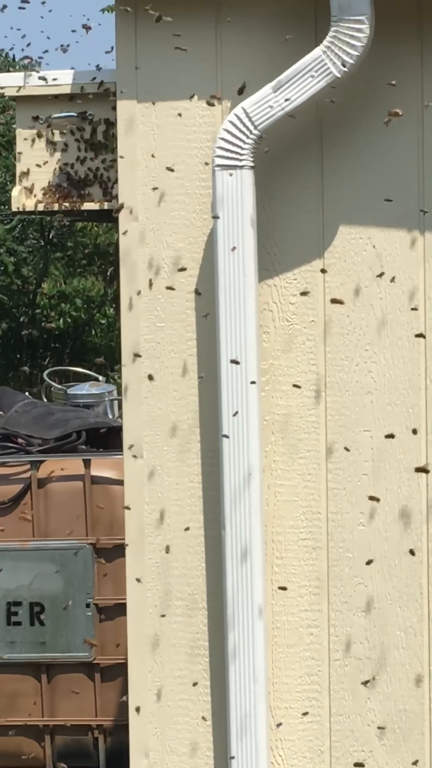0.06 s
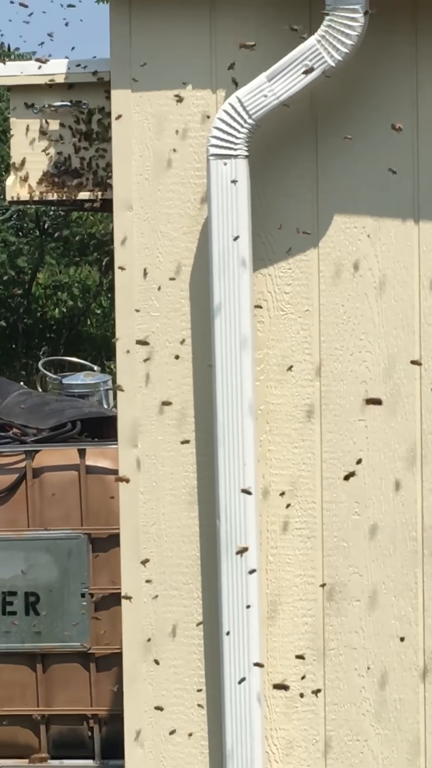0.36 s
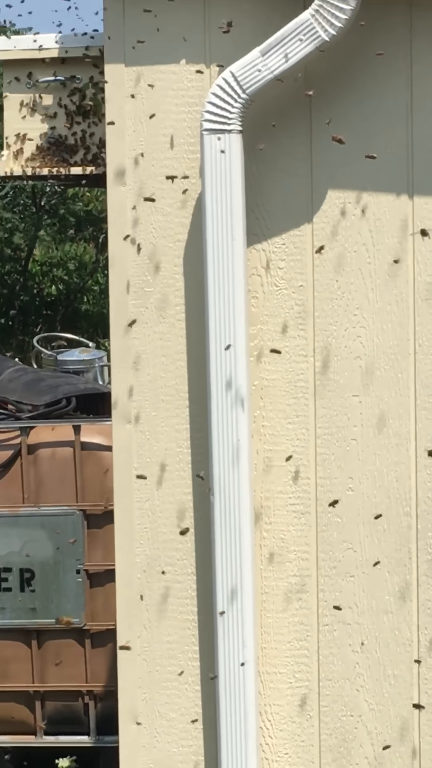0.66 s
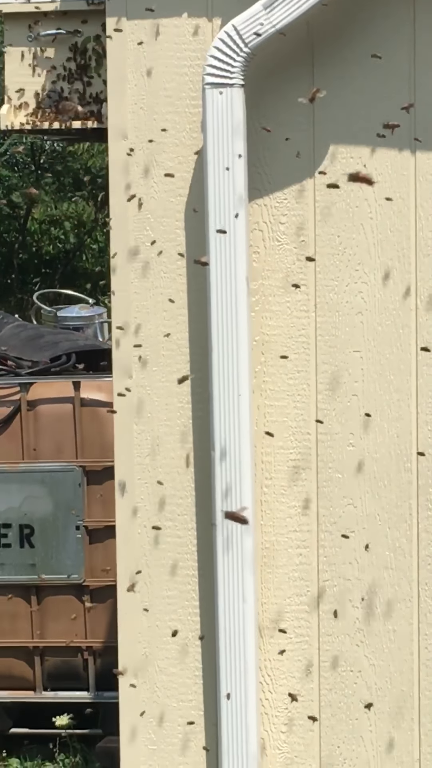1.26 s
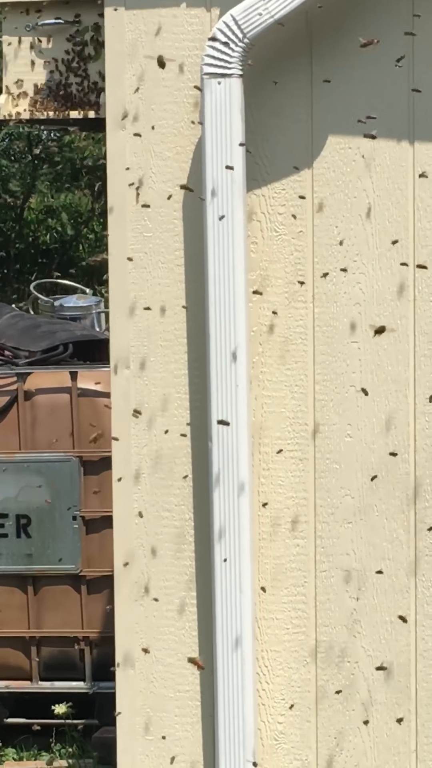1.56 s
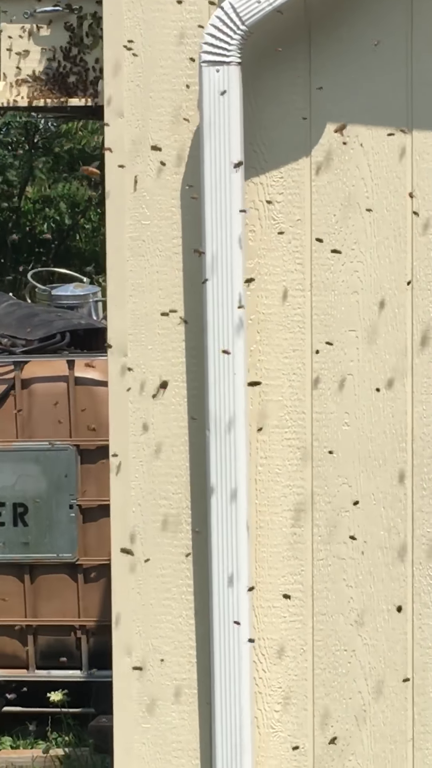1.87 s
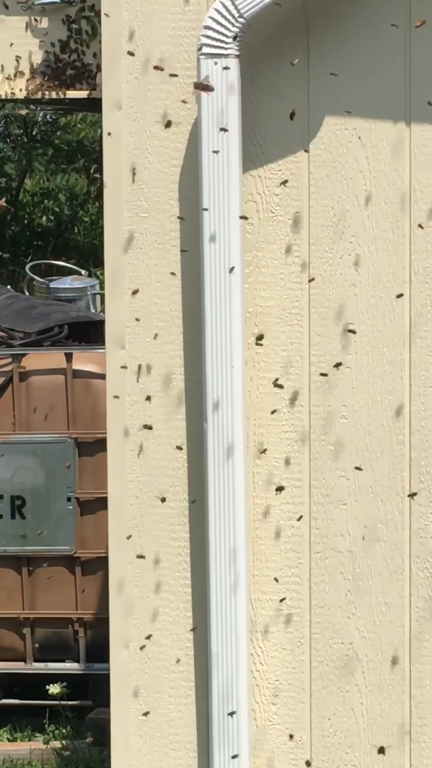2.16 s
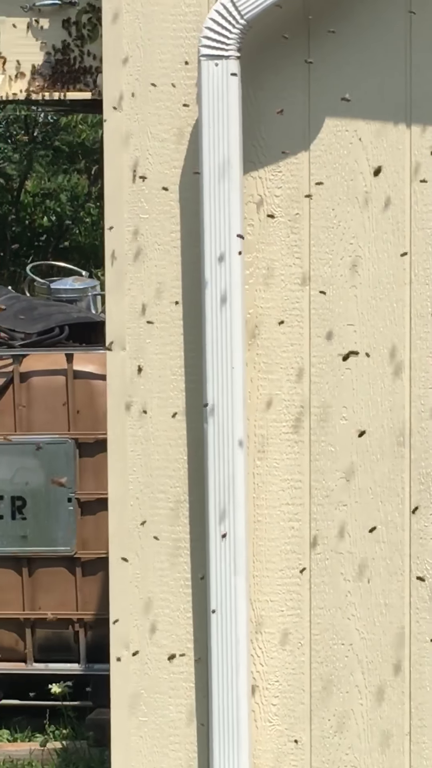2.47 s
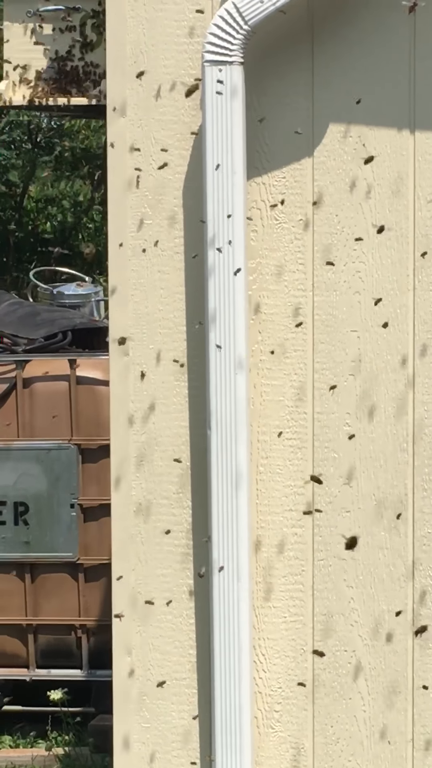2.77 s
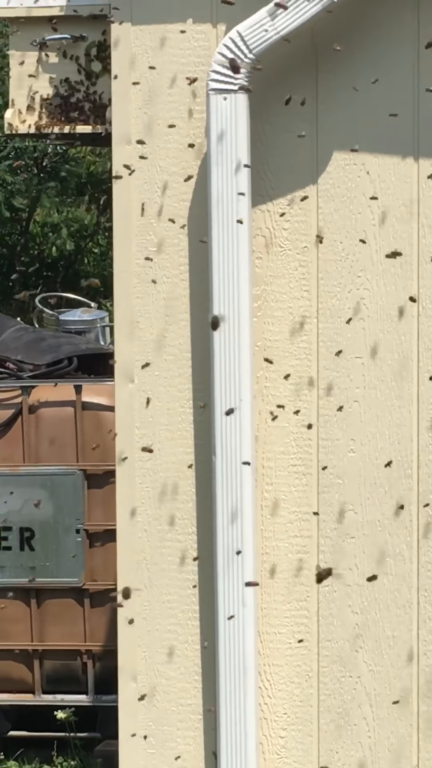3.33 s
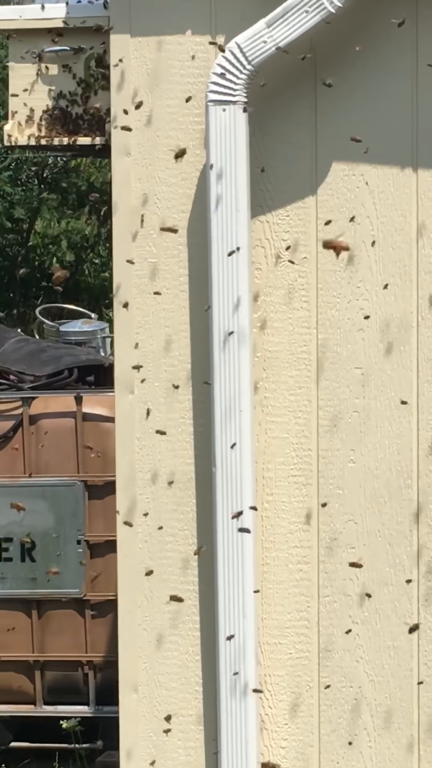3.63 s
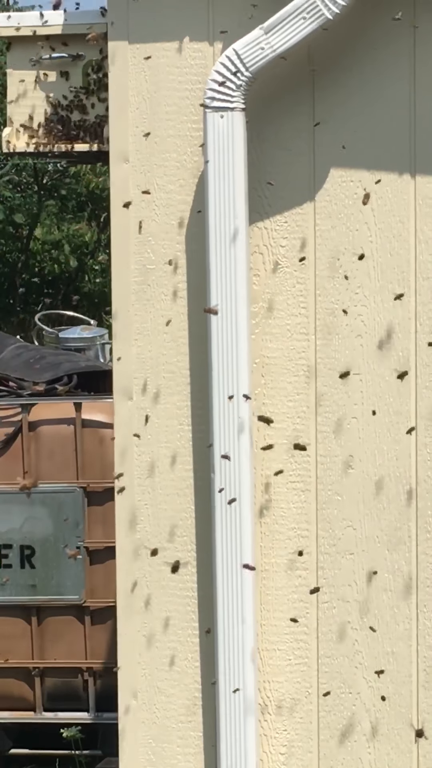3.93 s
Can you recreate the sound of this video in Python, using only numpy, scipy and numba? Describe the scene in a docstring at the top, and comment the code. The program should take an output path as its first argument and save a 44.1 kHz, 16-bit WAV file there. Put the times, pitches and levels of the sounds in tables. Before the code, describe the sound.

A swarm of bees buzzes steadily outdoors as wind gusts rumble on the microphone.

```python
"""Honeybees by a shed wall

A swarm mills about, a few bees close to the microphone, each droning at its own wandering wingbeat.
Gusts rumble on the microphone, sharp eddies buffet it and the hardest break into pops.
A fine steady hiss lies behind. The recorder's gain sinks a little after the loudest gusts."""
import sys
import numpy as np
from scipy import signal
from scipy.fft import rfft, irfft
from scipy.io import wavfile
from scipy.ndimage import uniform_filter1d
from numba import njit

SR = 44100
rng = np.random.default_rng(int(sys.argv[2]) if len(sys.argv) > 2 else 0)


def to_wav(sig):
    """Store sig (one row per channel, or 1-D mono) as 16-bit WAV at the path in sys.argv[1].

    Samples outside -1..1 are clipped; the rate is SR.
    """
    pcm = np.clip(np.atleast_2d(sig), -1, 1) * 32767
    pcm = np.round(pcm).astype(np.int16)
    wavfile.write(sys.argv[1], SR, pcm.T)  # frames by channels


N = 176400

# Spectral envelope of a bee's harmonics: f/Hz, relative level/dB
WING_SPECTRUM = [(170, 5.5), (195, 2), (250, -5), (340, 4), (390, -2.5), (480, -2.5), (570, -6.5),
                 (660, -8.5), (780, -6.5), (1050, -5.5), (1400, -10.5), (1900, -18), (3000, -19.5),
                 (5000, -29.5)]
# Wind strength on the microphone: t/s, level/dB
GUST_LEVELS = [(0, -52), (.05, -47), (.08, -41), (.22, -35.5), (.3, -60), (1.0, -57), (1.19, -53),
               (1.23, -39), (1.275, -58), (1.32, -36.5), (1.42, -60), (1.53, -55), (1.585, -28.5),
               (1.73, -33.5), (1.77, -22.5), (1.84, -29.5), (1.88, -24.5), (1.96, -28), (2.02, -20.5),
               (2.16, -30.5), (2.206, -16.5), (2.27, -38), (2.32, -32), (2.36, -25.5), (2.41, -39),
               (2.52, -45), (2.66, -39.5), (2.75, -39.5), (2.83, -30), (2.95, -34.5), (3.1, -36),
               (3.28, -33), (3.35, -24), (3.41, -31.5), (3.48, -29), (3.52, -23), (3.62, -19), (3.7, -22.5),
               (3.87, -27.5), (3.925, -10), (3.97, -20), (4.0, -18.5)]
# Spectrum of the wind rumble: f/Hz, relative level/dB
RUMBLE_SPECTRUM = [(12, -40), (22, -29), (42, 1.5), (62, 6.5), (100, -0.5), (135, -8), (200, -20),
                   (300, -28), (450, -42.5), (900, -73), (2000, -76)]
# Eddies striking the microphone: t/s, length/s, level/dB, corner f/Hz
EDDY_STRIKES = [(0.16, .035, -39.5, 168), (1.211, 0.013, -42.5, 190), (1.607, 0.023, -32.5, 190),
                (1.747, 0.014, -22, 220), (1.765, 0.015, -24, 204), (1.818, 0.024, -17, 194),
                (2.047, 0.024, -30.5, 180), (2.212, 0.0056, -29, 160), (2.334, 0.03, -26.5, 171),
                (3.276, 0.015, -32.5, 168), (3.321, 0.039, -30, 139), (3.51, 0.011, -25.5, 118),
                (3.592, 0.0053, -22, 150), (3.881, 0.03, -23, 190), (3.913, 0.041, -10.5, 183),
                (3.947, 0.026, -17, 338)]
# Pops within the hardest eddies: t/s, peak level before the low-pass/dB, centre f/Hz
AIR_POPS = [(1.747, -24.5, 610), (1.748, -15, 245), (1.8178, -20.5, 456), (1.8295, -22, 380),
            (2.3466, -27, 186), (3.9175, -23, 850), (3.9238, -12, 597), (3.9348, -14.5, 675),
            (3.9369, -7.5, 473), (3.9543, -15, 525), (3.957, -9, 410), (3.9622, -19.5, 750)]
# Spectrum of the background hiss: f/Hz, relative level/dB
HISS_SPECTRUM = [(30, 15), (60, 10.5), (130, 13), (300, 4), (1000, 10.5), (3000, -3.5), (4400, -3),
                 (4900, -6), (5500, -0.5), (6500, 1), (7900, -1.5), (8700, 1.5), (9900, 1), (10450, -3),
                 (11100, 1), (15500, 1)]

WINGBEAT_HZ, FAST_WINGBEAT_HZ = 192.5, 239.8
WANDER, FLUTTER = .052, .009  # shares of the pitch: steering, wing unsteadiness
EDDY_LOW_HZ, EDDY_TOP_HZ, EDDY_ORDER = 93, 1470, 3.12
EDDY_ATTACK_S, EDDY_RELEASE_S = .0019, .0059
POP_TOP_HZ, RECORDER_TOP_HZ = 1730, 15750
AGC_THRESHOLD_DB, AGC_SLOPE, AGC_ATTACK_S, AGC_RELEASE_S = -30.5, .14, .032, .31


def swarm():
    """The cloud, a few bees near the microphone and a few flying hard; all swell and sway together."""
    sway = 1 + .012 * walk(4)
    cloud = undb(-48.5) * bees(WINGBEAT_HZ, sway, spread=.075, pass_db=8, count=40)
    near = undb(-55.5) * bees(WINGBEAT_HZ, sway, spread=.075, pass_db=14, count=6)
    fast = undb(-55.5) * bees(FAST_WINGBEAT_HZ, sway, spread=.04, pass_db=2.5, count=7)
    swell = undb(.14 * walk(4))
    return (cloud + near + fast) * swell


def bees(centre_hz, sway, spread, pass_db, count):
    """Each bee repeats its own wing stroke; pitch wanders as it steers, level as it comes and goes."""
    out = np.zeros(N)
    harmonics = np.arange(1, 27)
    ranks = np.linspace(-1, 1, count + 2)[1:-1]
    for offset in np.arctanh(ranks):  # most bees lie near the centre pitch
        hz = centre_hz * np.exp(spread * offset)
        strengths = gains(WING_SPECTRUM, harmonics * hz) * undb(1.12 * rng.standard_normal(len(harmonics)))
        phases = np.exp(2j * np.pi * rng.random(len(harmonics)))
        stroke = unit(irfft(np.r_[0, strengths * phases], 8192))  # one wingbeat
        pitch_hz = hz * (sway + WANDER * walk(5.5) + FLUTTER * walk(35))
        beats = np.cumsum(pitch_hz) / SR
        drone = stroke[(beats * len(stroke)).astype(int) % len(stroke)]
        nearness = undb(pass_db * np.tanh(walk(5.5)))
        out += drone * nearness
    return unit(out)


def wind(t):
    """Turbulence at the microphone port: a low rumble that follows the gusts."""
    rumble = noise(lambda hz: gains(RUMBLE_SPECTRUM, hz))
    power = uniform_filter1d(np.abs(signal.hilbert(rumble)) ** 2, size=900)
    steadied = unit(rumble / np.sqrt(power) ** .23)  # partly evens out the noise's own swells
    when, db = np.array(GUST_LEVELS).T
    return steadied * undb(.5 + np.interp(t, when, db))


def eddies(t):
    """Short dull blows of air on the microphone; faster eddies reach higher in frequency."""
    out = np.zeros(N)
    for start, length, db, corner_hz in EDDY_STRIKES:
        air = noise(lambda hz: rolloff(EDDY_LOW_HZ / hz, order=2)
                    * rolloff(hz / corner_hz, order=EDDY_ORDER)
                    * rolloff(hz / EDDY_TOP_HZ, order=10))
        age = t - start
        attack = np.clip(age / EDDY_ATTACK_S, 0, 1)
        release = np.exp(-np.maximum(age + EDDY_RELEASE_S - length, 0) / EDDY_RELEASE_S)
        envelope = attack * release
        blow = air * envelope
        energy_trim = np.sqrt(np.sum(envelope ** 2) / (np.sum(blow ** 2) + 1e-12))
        out += undb(db) * blow * energy_trim
    return out


def pops(t):
    """Single quick swings of pressure where the air tears off the microphone port."""
    out = np.zeros(N)
    for when, db, hz in AIR_POPS:
        swing = 2 * np.pi * hz * (t - when)
        out -= undb(db) * swing * np.exp((1 - swing ** 2) / 2)
    return signal.sosfiltfilt(signal.butter(6, POP_TOP_HZ, fs=SR, output="sos"), out)


def hiss():
    """A fine hiss behind the bees, its level barely wavering."""
    return undb(-50 + .18 * walk(10)) * noise(lambda hz: gains(HISS_SPECTRUM, hz))


def undb(db):
    """Decibels to gain."""
    return 10 ** (np.asarray(db) / 20)


def unit(x):
    """Scale to rms 1."""
    return x / np.sqrt(np.mean(x ** 2))


def gains(spectrum, hz):
    """Gain of an (f/Hz, level/dB) table at the given frequencies."""
    f, db = np.array(spectrum, float).T
    return undb(np.interp(np.log(np.maximum(hz, 1)), np.log(f), db))


def rolloff(ratio, order):
    """Filter gain that falls as the frequency ratio passes 1."""
    return 1 / np.sqrt(1 + ratio ** (2 * order))


def noise(shape):
    """Noise of rms 1 whose spectrum follows shape(hz)."""
    hz = np.arange(N // 2 + 1) * SR / N + 1
    return unit(irfft(rfft(rng.standard_normal(N)) * shape(hz), N))


def walk(per_s):
    """Smooth drift through per_s random values a second; spread near 1."""
    knots = rng.standard_normal(size=1024)
    place = rng.random() + np.arange(N) / SR * per_s
    k = place.astype(int)
    part = place - k
    ease = part * part * (3 - 2 * part)
    return 1.15 * (knots[k] + (knots[k + 1] - knots[k]) * ease)


@njit
def follow(x, rise, fall):
    """Level follower with separate rise and fall steps per sample."""
    out, level = np.empty(len(x)), 0.
    for i in range(len(x)):
        level += (x[i] - level) * (rise if x[i] > level else fall)
        out[i] = level
    return out


def scene():
    """Bees, wind and hiss at one microphone beside the shed wall."""
    t = np.arange(N) / SR
    return (hiss() + swarm() + wind(t) + eddies(t) + pops(t))[None]


def record(dry):
    """The recorder's automatic gain control gives way to loud gusts; the top treble is cut steeply."""
    loudness = follow(np.abs(dry[0]), 1 / (AGC_ATTACK_S * SR), 1 / (AGC_RELEASE_S * SR))
    gain = np.maximum(loudness / undb(AGC_THRESHOLD_DB), 1) ** -AGC_SLOPE
    lowpass = signal.ellip(12, .1, 80, RECORDER_TOP_HZ, fs=SR, output="sos")
    return signal.sosfilt(lowpass, dry * gain)


dry = scene()
out = record(dry)
to_wav(out)
```